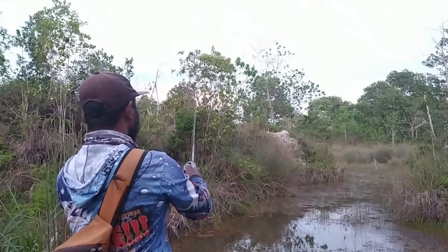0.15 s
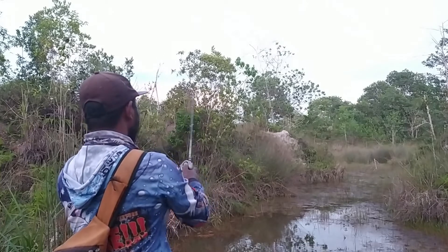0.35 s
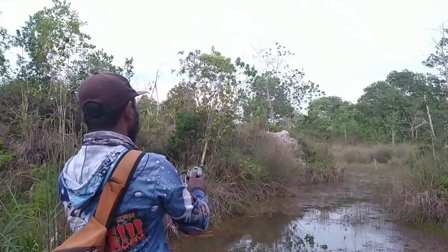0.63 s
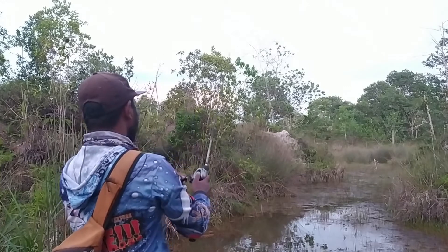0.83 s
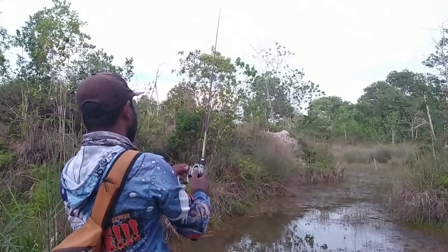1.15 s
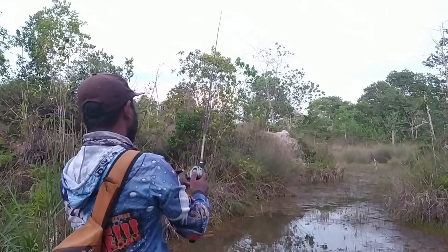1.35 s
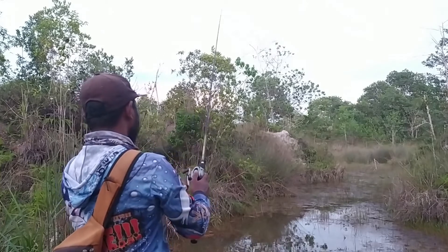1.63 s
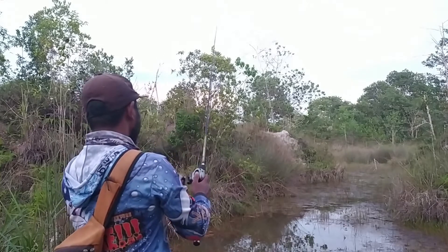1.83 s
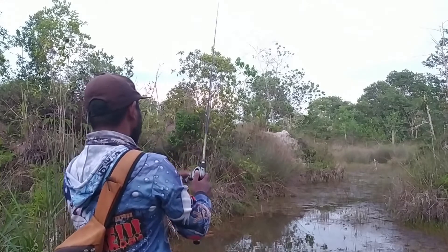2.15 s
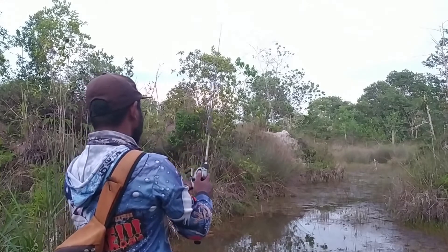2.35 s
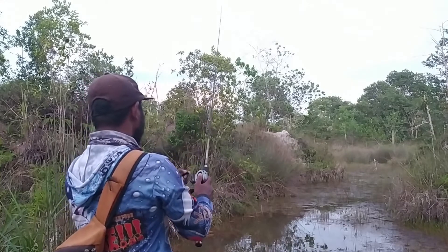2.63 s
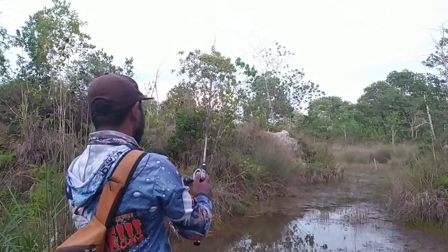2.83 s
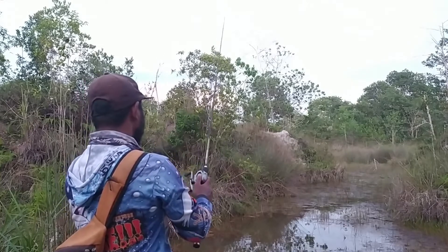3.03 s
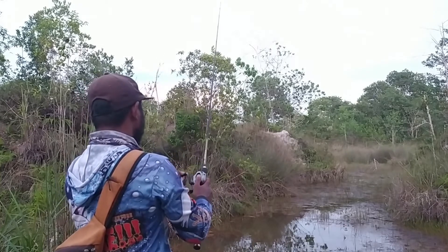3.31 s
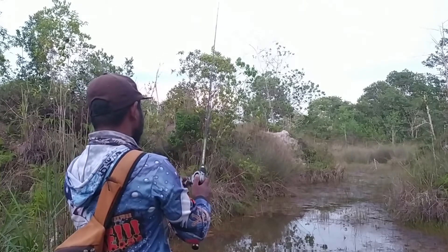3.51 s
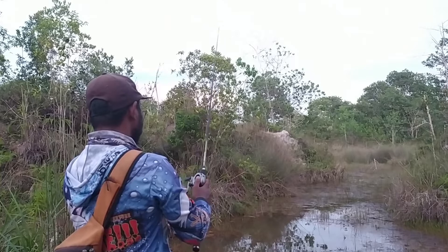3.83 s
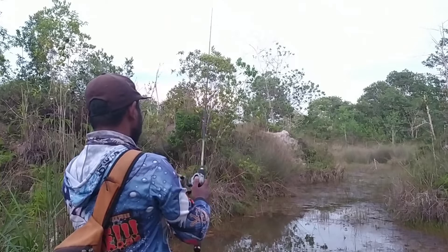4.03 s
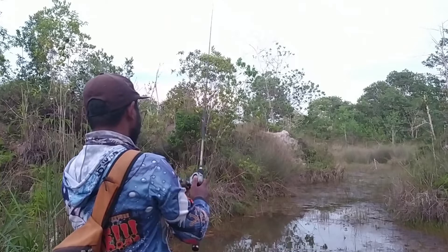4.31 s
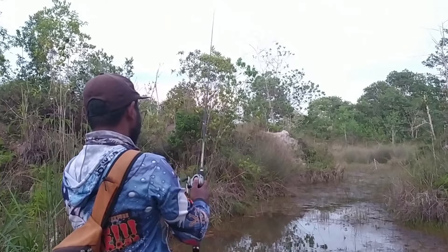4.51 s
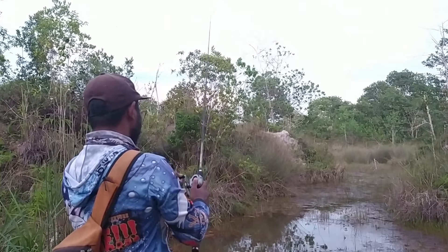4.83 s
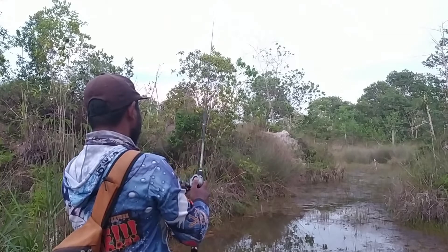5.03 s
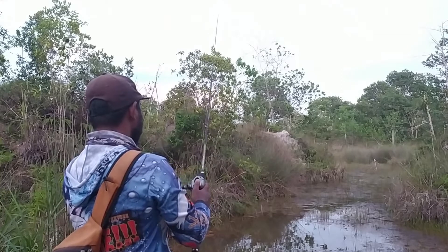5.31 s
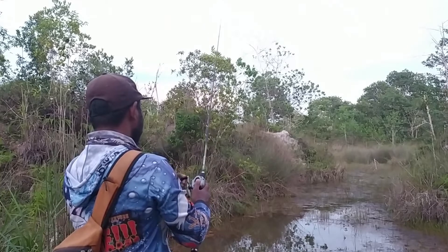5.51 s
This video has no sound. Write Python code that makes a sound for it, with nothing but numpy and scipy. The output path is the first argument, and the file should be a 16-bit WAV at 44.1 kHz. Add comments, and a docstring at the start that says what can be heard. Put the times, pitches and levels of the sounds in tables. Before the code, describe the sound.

Loud, high, rapid insect trill outdoors by a pond, with a sharp reel click, rattling bird notes and fluttering, half-hoarse whistles behind.

```python
"""From the start a cricket close on the right trills, gliding tones on a beat with one stroke left out, while
leaves and water scatter every stroke; shaped noise gives a quiet breeze, far insects and hiss.
Soon birds warble farther off in the trees, arched whistles partly roughened by noise; a fishing reel snaps
shut once, decaying bursts of coloured noise. Then another bird rattles, in groups of three double-voiced
notes, and later come thin high glides of near sines: some are overtones of the warble, others quick chips."""
import sys
import numpy as np
from scipy import signal
from scipy.fft import rfft, irfft
from scipy.io import wavfile
from scipy.ndimage import uniform_filter1d

SR = 44100
rng = np.random.default_rng(int(sys.argv[2]) if len(sys.argv) > 2 else 0)


def to_wav(s):
    """Save 16-bit WAV."""
    ch = np.atleast_2d(s).T  # columns
    pcm = np.round(np.clip(ch, -1, 1) * 32767)  # PCM
    wavfile.write(sys.argv[1], SR, pcm.astype(np.int16))


N = 249606  # length in samples


def from_db(db):
    """Level definition: an amplitude ratio is ten to the power of dB / 20."""
    return 10 ** (np.asarray(db) / 20)


def rms_one(x):
    """Normalisation: scale a signal to unit root-mean-square amplitude."""
    return x / np.sqrt(np.mean(x ** 2) + 1e-20)


def at_hz(points, hz):
    """Logarithmic frequency scale: interpolate a table along log frequency."""
    point_hz, value = np.transpose(points)
    return np.interp(np.log(hz), np.log(point_hz), value)


def lowpass_noise(cut_hz):
    """Band limitation: low-passed noise of unit RMS varies only as fast as its cutoff allows."""
    sos = signal.butter(4, cut_hz, fs=SR, output="sos")
    return rms_one(signal.sosfilt(sos, rng.standard_normal(N)))


def scatter(x, t60):
    """Diffuse scattering: many weak echoes act as dying noise of unit energy, independent on each side."""
    age = np.arange(SR // 2) / SR
    onset = np.minimum(age / .003, 1)
    tail = rng.standard_normal((2, len(age))) * from_db(-60 * age / t60) * onset
    tail /= np.sqrt(np.sum(tail ** 2, axis=1, keepdims=True))
    return signal.fftconvolve(x[None], tail, axes=1)[:, :N]


def notes(starts_s, gains, detune, shape, overtone_db):
    """Frequency modulation: phase integrates a gliding pitch; each note has its own tuning and phase."""
    ms, hz, db = np.transpose(shape)
    age_ms = np.arange(int(ms[-1] * SR / 1000)) * 1000 / SR
    glide = 2 * np.pi * np.cumsum(np.interp(age_ms, ms, hz)) / SR
    phase = glide * detune[:, None] + 2 * np.pi * rng.random((len(gains), 1))
    fade_in = np.minimum(age_ms, 1)
    envelope = uniform_filter1d(from_db(np.interp(age_ms, ms, db)) * fade_in, size=30)
    wave = gains[:, None] * envelope * (np.sin(phase) + from_db(overtone_db) * np.sin(2 * phase))
    out = np.zeros(N + SR)
    first = np.round(starts_s * SR).astype(int)
    np.add.at(out, first[:, None] + np.arange(len(age_ms)), wave)  # overlapping notes add up
    return out[:N]


# likeness of left and right in the background noise: f/Hz, correlation (0-1)
LEFT_RIGHT_LIKENESS = [(25, .58), (125, .34), (250, .19), (500, .1), (16000, .02)]


def coloured_noise(spectrum):
    """Spectral density and coherence: noise shaped per Hz, its sides sharing a common part."""
    hz = np.arange(N // 2 + 1) * SR / N + .01  # the offset keeps the logarithm finite
    mid, side = rfft(rng.standard_normal((2, N)) * np.sqrt(SR / 4))
    alike = at_hz(LEFT_RIGHT_LIKENESS, hz)
    inside = (hz > spectrum[0][0] / 2) * (hz < spectrum[-1][0] * 1.06)  # silent well outside the table
    gain = from_db(at_hz(spectrum, hz)) * inside
    common, opposed = np.sqrt(1 + alike) * mid, np.sqrt(1 - alike) * side
    return irfft(gain * (common + opposed * [[1], [-1]]), N)


# spectrum of breeze, far insects and hiss: f/Hz, level/dB per Hz
AIR_SPECTRUM = [(12, -70), (17, -66.5), (30, -83), (120, -91.5), (300, -94.5), (600, -103), (1500, -106),
                (2400, -103), (3400, -110), (4200, -108), (5000, -103), (5800, -114)]


def breeze():
    """Stationary noise: breeze, far insects and hiss share one steady spectrum."""
    return coloured_noise(AIR_SPECTRUM)


# spectrum of the far cricket chorus and the hiss above it: f/Hz, level/dB per Hz
CHORUS_SPECTRUM = [(5800, -125), (6500, -102), (8600, -82.5), (9500, -101), (10200, -122), (12800, -124),
                   (13600, -112), (15600, -105)]


def far_chorus():
    """Incoherent summation: many far crickets merge into a narrow hump of noise."""
    return coloured_noise(CHORUS_SPECTRUM)


# one wing stroke; the file slows down, so the pitch falls: t/ms, f/Hz, level/dB
WING_STROKE = [(0, 8260, -42), (1.5, 8215, -26), (2.6, 8170, -22), (3.7, 8090, -20.3), (4.6, 7990, -23),
               (5.2, 7800, -31), (7.5, 7500, -30.5), (9.7, 7150, -32), (11, 6800, -37.5), (12.5, 6550, -58)]
# ways from the cricket to the microphones: delay/ms, left level/dB, right level/dB
SOUND_PATHS = [(0, -99, 0), (.35, -12, -99), (6.6, -15.5, -18), (8.2, -20, -20), (13.5, -22, -19)]
# how far the cricket drags behind its even beat: t/s, lateness/ms (negative is early)
BEAT_DRAG = [(0, 0), (.62, -2.2), (1.05, -.8), (1.43, -2.1), (2.0, -.4), (2.42, .4), (2.75, -1.7),
             (3.62, -1.8), (4.21, .7), (4.365, 5.9), (4.41, 4.1), (4.56, 2.8), (4.72, .5), (5.2, .2),
             (5.65, 3.6)]
FIRST_STROKE_S, STROKES_PER_S, MISSED_S = .0073, 45.924, 4.389  # one stroke is left out
STROKE_JITTER_MS, STROKE_SPREAD_DB, STROKE_DETUNE = .22, .3, .002  # standard deviations; detune is a share
OVERTONE_DB = -39
LEAVES_DB, LEAVES_T60_S = (-15.5, -6.5), .3  # scattered sound, left and right


def cricket():
    """Stridulation and multipath: wing strokes arrive directly, by strong echoes and by scattering."""
    beat = np.arange(FIRST_STROKE_S, N / SR, 1 / STROKES_PER_S)
    beat = beat + np.interp(beat, *np.transpose(BEAT_DRAG)) / 1000
    jitter, loudness, tuning = rng.standard_normal((3, len(beat)))
    starts = np.maximum(beat + STROKE_JITTER_MS / 1000 * jitter, 0)
    sounding = np.abs(beat - MISSED_S) > .5 / STROKES_PER_S
    gains = from_db(STROKE_SPREAD_DB * loudness) * sounding
    song = notes(starts, gains, 1 + STROKE_DETUNE * tuning, WING_STROKE, OVERTONE_DB)
    out = from_db(LEAVES_DB)[:, None] * scatter(song, LEAVES_T60_S)
    for delay_ms, left_db, right_db in SOUND_PATHS:
        lag = int(delay_ms * SR / 1000)
        out[:, lag:] += from_db([[left_db], [right_db]]) * song[:N - lag]
    return out


# middle level of the far-off random notes, before WARBLE_DB: t/s, level/dB
CHATTER_LEVEL = [(0, -76), (.3, -69), (1.3, -75.5), (2.2, -77.5), (3.5, -68), (4.1, -83.5), (4.4, -83.5),
                 (5.0, -66), (5.66, -78)]
CHATTER_PER_S, CHATTER_TOP_HZ, CHATTER_LENGTH_S = 40, (2300, 3100), (.03, .09)


def chatter():
    """Random superposition: rows for faint, half-hoarse notes at chance times, pitches and lengths."""
    when, length, pitch, loud = rng.random((4, int(CHATTER_PER_S * N / SR)))
    top_s = .1 + when * (N / SR - .2)
    length_s = np.interp(length, [0, 1], CHATTER_LENGTH_S)
    top_hz = np.interp(pitch, [0, 1], CHATTER_TOP_HZ)
    db = np.interp(top_s, *np.transpose(CHATTER_LEVEL)) + 6 * (loud - .5)
    return list(zip(top_s, length_s, top_hz, db, np.full(len(top_s), .5)))


# warbled notes, each arching up and down; level at half height, before WARBLE_DB:
# t of the top/s, length/s, f of the top/Hz, level/dB, hoarseness (clipped to 0-1)
WARBLE_NOTES = [(.29, .085, 2710, -63, 0.6), (.50, 0.095, 3090, -59.5, 0.4), (.79, 0.14, 3120, -59.5, 0.42),
                (1.082, 0.18, 3103, -60.5, 0.54), (1.26, .11, 2900, -67, 0.64),
                (1.515, 0.096, 2463, -58.5, 0.07), (1.768, 0.12, 2538, -58.5, 0.42),
                (1.812, 0.11, 2823, -57.5, 0.65), (2.098, 0.11, 2577, -54.5, 0.42),
                (2.153, 0.1, 2864, -61.5, 0.65), (2.392, .10, 2865, -60.5, 0.65),
                (2.462, 0.15, 2585, -54, 0.54), (2.555, 0.12, 2620, -46.5, 0.09),
                (2.738, 0.16, 2644, -51, 0.42), (2.816, 0.075, 2600, -47.5, 0.23),
                (2.818, 0.033, 2070, -53.5, 0.1), (3.005, 0.15, 2565, -52, 0.53),
                (3.117, .055, 2120, -55.5, 0), (3.18, 0.14, 2996, -50.5, .6),
                (3.19, .10, 2446, -50.5, 0.95), (3.27, 0.084, 2610, -58, 0.7), (3.46, 0.14, 3095, -55, 0.5),
                (3.457, .09, 2533, -54.5, 0.6), (3.565, 0.12, 2620, -47.5, 0.22),
                (3.748, 0.14, 3000, -56.5, .5), (3.765, 0.13, 2520, -56, 0.84),
                (3.892, 0.15, 2545, -52.5, 0.42), (4.032, .06, 2690, -65.5, 1.1),
                (4.505, 0.042, 2300, -64, 0.3), (4.56, .065, 2620, -55, .5), (4.60, 0.072, 2605, -54, .6),
                (4.642, 0.1, 2334, -51.5, 0.23), (4.68, 0.068, 1960, -62, .4),
                (4.953, .15, 2590, -50.5, 0.52), (4.935, .10, 3000, -56, 0.5),
                (5.01, .09, 2930, -61.5, 0.7), (5.14, .07, 2360, -63, .3), (5.218, 0.14, 2920, -55, 0.44),
                (5.245, .06, 2366, -55.5, 0.2), (5.344, 0.15, 2636, -54.5, 0.17)]
WARBLE_DB, NOTE_EDGE_DB = -1, -10  # shift of all notes; level of the ends against the top
FALL_S, FALL_SHARE = .057, .55  # the fall lasts this long, in short notes this share of the length
RISE_S = .07  # a longer note first holds its low pitch
ARCH_DEPTH, FULL_ARCH_S = .22, .09  # share of pitch lost at the ends of a note at least this long
FLUTTER_HZ, FLUTTER_DEPTH = 72, .56
HOARSE_HZ, HOARSE_DROP = 220, .05  # noise cutoff; share by which the hoarse tone is lower
THROAT_HZ = (1850, 3100)


def warble():
    """Amplitude modulation: arched whistles flutter, their hoarse share lower and shaken by noise."""
    out = np.zeros(N)
    shake = lowpass_noise(HOARSE_HZ)
    flutter = 1 + FLUTTER_DEPTH * lowpass_noise(FLUTTER_HZ)
    for top, length, top_hz, db, hoarse in WARBLE_NOTES + chatter():
        end = top + min(FALL_S, FALL_SHARE * length)
        start = end - length
        on = slice(int(start * SR), int(end * SR))
        t = np.arange(on.start, on.stop) / SR
        rise_start = max(start, top - RISE_S)
        height = np.sin(np.interp(t, [rise_start, top, end], [0, np.pi / 2, np.pi])) ** 2
        depth = ARCH_DEPTH * min(length / FULL_ARCH_S, 1) ** 2  # short notes arch less
        phase = 2 * np.pi * np.cumsum(top_hz * (1 - depth * (1 - height))) / SR
        hoarse = np.clip(hoarse, 0, 1)
        clear = flutter[on] * np.sin(phase)
        rough = shake[on] * np.sin((1 - HOARSE_DROP) * phase)
        voice = np.sqrt(1 - hoarse) * clear + np.sqrt(hoarse) * rough
        fade = np.clip(np.minimum(t - start, end - t) / .008, 0, 1)
        out[on] += from_db(db + WARBLE_DB + NOTE_EDGE_DB * (.5 - height)) * fade * voice
    return signal.sosfilt(signal.butter(4, THROAT_HZ, "band", fs=SR, output="sos"), out)


# blows of the closing bail: t/s, level/dB, t60/s
BAIL_BLOWS = [(.3666, -36, .02), (.3712, -35, .022), (.375, -41, .05), (.388, -56, .10), (.414, -58, .03)]
# colour of the crack, before it is set to unit RMS: f/Hz, level/dB
CRACK_SPECTRUM = [(300, -25), (700, -0.5), (1300, -1.5), (2500, 2.5), (5000, 2.5), (7000, -11),
                  (10000, 4.5), (12500, -15), (16000, -22)]
REEL_ECHO_DB, REEL_ECHO_T60_S, REEL_ECHO_CUT_HZ = -7, .14, 1800  # thin echoes from the bank


def reel():
    """Impact excitation: the bail closes in a few blows, its many small parts answering with dying cracks."""
    t = np.arange(N) / SR
    blows = np.zeros(N)
    for start, db, t60 in BAIL_BLOWS:
        blows += from_db(db - 60 * np.maximum(t - start, 0) / t60) * (t >= start)
    hz = np.arange(N // 2 + 1) * SR / N + 1
    parts = irfft(rfft(rng.standard_normal(N)) * from_db(at_hz(CRACK_SPECTRUM, hz)), N)
    crack = blows * rms_one(parts)
    thin = signal.sosfilt(signal.butter(2, REEL_ECHO_CUT_HZ, "high", fs=SR, output="sos"), crack)
    return crack + from_db(REEL_ECHO_DB) * scatter(thin, REEL_ECHO_T60_S)


# rattles of three notes each, before RATTLE_DB: t/s, level/dB
RATTLE_GROUPS = [(0.56, -48.5), (.779, -47.5), (1.026, -48.5), (1.308, -50), (1.546, -63.5), (1.641, -62),
                 (1.756, -56.5), (4.12, -64), (4.31, -61.5), (4.53, -61)]
# the falling voice of a rattle note: t/ms, f/Hz, level/dB
FALLING_VOICE = [(0, 5350, -10.5), (5, 5100, -2.5), (12, 4700, -7.5), (20.6, 4350, -19.5)]
# the second voice, which dips and then rises: t/ms, f/Hz, level/dB
RISING_VOICE = [(0, 5000, -59), (10, 4000, -22), (15.85, 5100, -3.5), (23.7, 5300, -17.5)]
RATTLE_DB, RATTLE_SPREAD_DB = 5, 1.5  # shift of all notes; standard deviation
RATTLE_GAP_S, RATTLE_SWELL_DB = .0355, (0, 0, -3)  # spacing and level of the three notes


def rattle():
    """Two-voice superposition: each note of a group adds a falling and a rising glide."""
    rows = [(start + RATTLE_GAP_S * k, db + swell_db) for start, db in RATTLE_GROUPS
            for k, swell_db in enumerate(RATTLE_SWELL_DB)]
    starts, db = np.transpose(rows)
    loudness, tuning = rng.standard_normal((2, len(starts)))
    gains = from_db(db + RATTLE_DB + RATTLE_SPREAD_DB * loudness)
    detune = 1 + .015 * tuning
    return sum(notes(starts, gains, detune, voice, -83) for voice in (FALLING_VOICE, RISING_VOICE))


# thin high glides: overtones of the warble at 1.479, 4.60 and 4.922 s, the others quick chips;
# RMS level at mid-glide: t/s, length/s, start f/Hz, end f/Hz, level/dB
HIGH_GLIDES = [(1.479, 0.05, 4430, 4950, -60), (3.421, 0.021, 6300, 5200, -52),
               (4.60, 0.069, 4330, 4900, -71), (4.716, .016, 6350, 5100, -51),
               (4.922, 0.043, 5300, 4600, -61.5), (5.426, 0.013, 4160, 5060, -53),
               (5.441, .018, 5180, 3270, -57)]
GLIDE_EDGE_DB, GLIDE_BEND = 1, 1.3  # ends louder before the fades; falls slow down, rises speed up


def high_glides():
    """Frequency glide: near sines sweep once, fading in and out within 3 ms."""
    out = np.zeros(N)
    for start, length, start_hz, end_hz, db in HIGH_GLIDES:
        part = np.linspace(0, 1, int(length * SR))
        low, high = sorted([start_hz, end_hz])
        climb = part if end_hz > start_hz else 1 - part
        hz = low + (high - low) * climb ** GLIDE_BEND
        fade = np.clip(np.minimum(part, 1 - part) * length / .003, 0, 1)
        level = np.sqrt(2) * fade * from_db(db + GLIDE_EDGE_DB * np.abs(2 * part - 1))
        out[int(start * SR):][:len(part)] += level * np.sin(2 * np.pi * np.cumsum(hz) / SR)
    return out


TREES_DB, TREES_T60_S, RATTLE_DIRECT_DB, LEFT_LAG_MS = -6.5, .2, 4, .085


def birds():
    """Interaural delay and scattering: trees blur all calls, the rattle more direct; the left lags."""
    calls, rattling = warble() + high_glides(), rattle()
    direct = calls + from_db(RATTLE_DIRECT_DB) * rattling
    late = np.interp(np.arange(N) - LEFT_LAG_MS * SR / 1000, np.arange(N), direct)
    return np.array([late, direct]) + from_db(TREES_DB) * scatter(calls + rattling, TREES_T60_S)


def scene():
    """Linear superposition: the sound pressures of all sources add."""
    return breeze() + far_chorus() + cricket() + birds() + reel()


CUTOFF_HZ = 15780


def record(dry):
    """Band limitation: a steep elliptic low-pass cuts the top."""
    return signal.sosfilt(signal.ellip(12, .5, 70, CUTOFF_HZ, fs=SR, output="sos"), dry)


dry = scene()
out = record(dry)
to_wav(out)
```